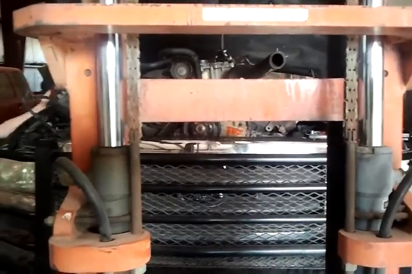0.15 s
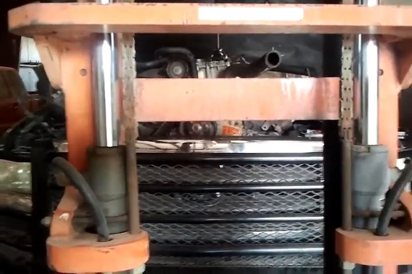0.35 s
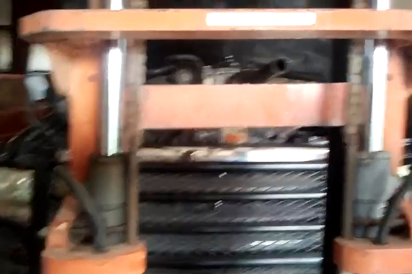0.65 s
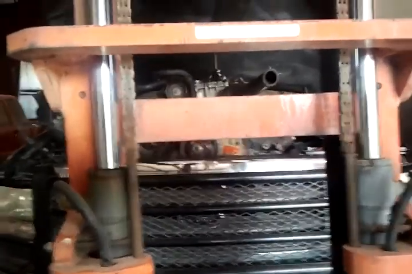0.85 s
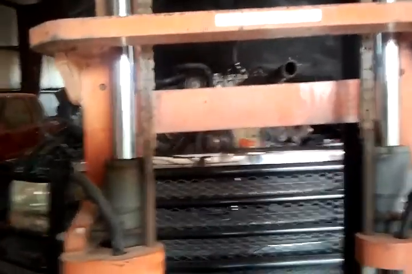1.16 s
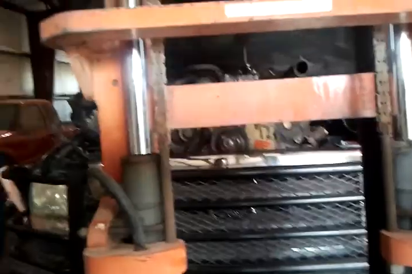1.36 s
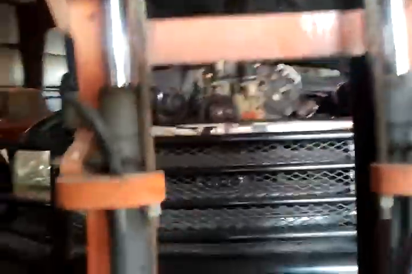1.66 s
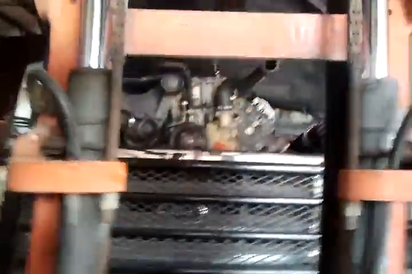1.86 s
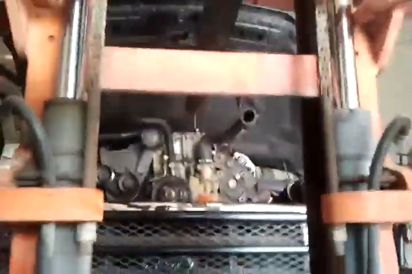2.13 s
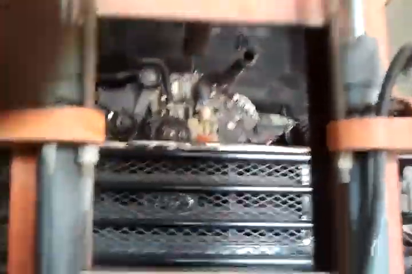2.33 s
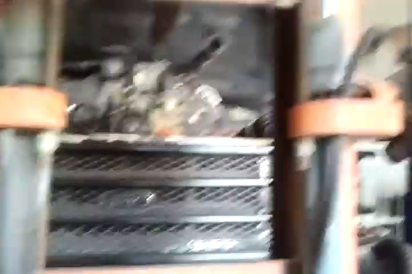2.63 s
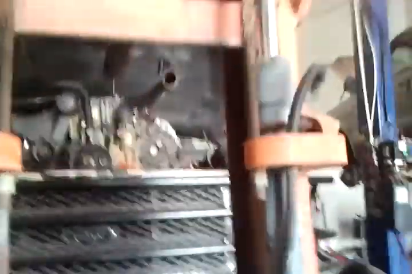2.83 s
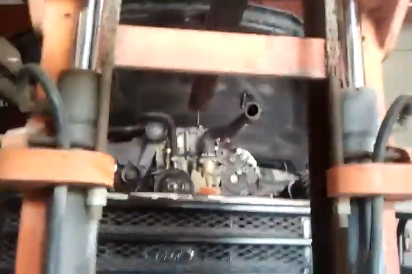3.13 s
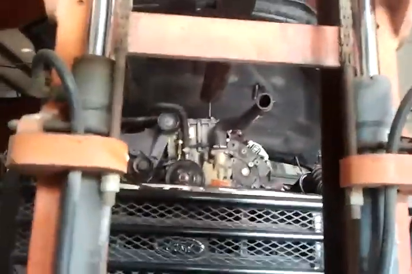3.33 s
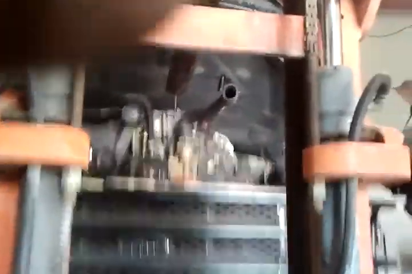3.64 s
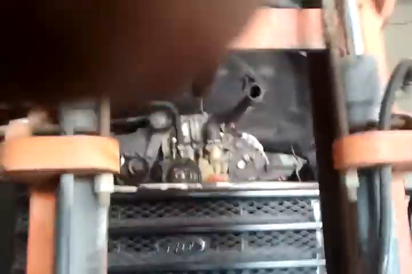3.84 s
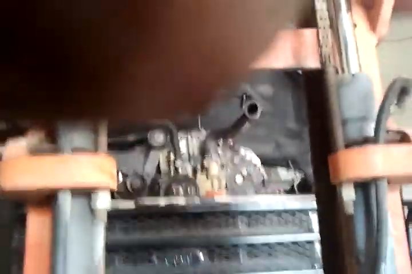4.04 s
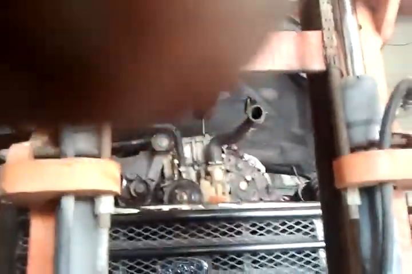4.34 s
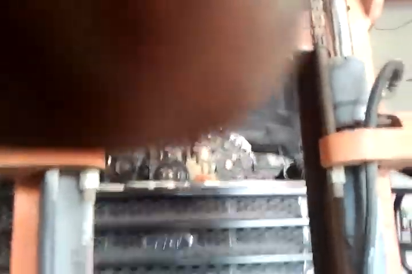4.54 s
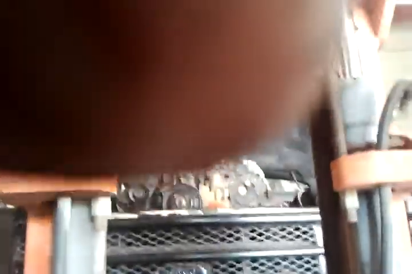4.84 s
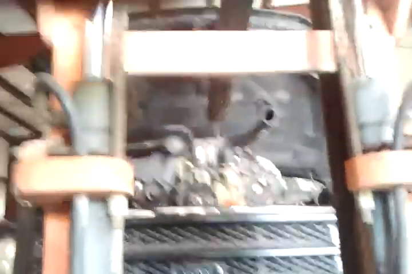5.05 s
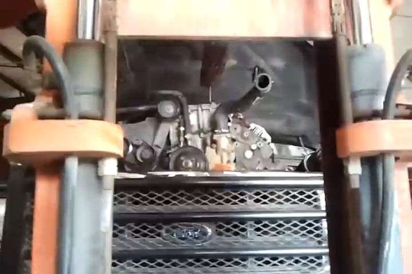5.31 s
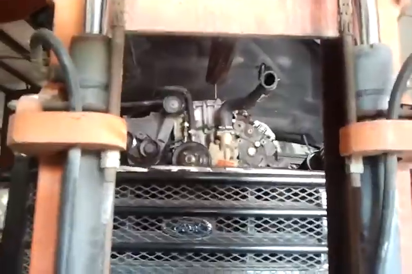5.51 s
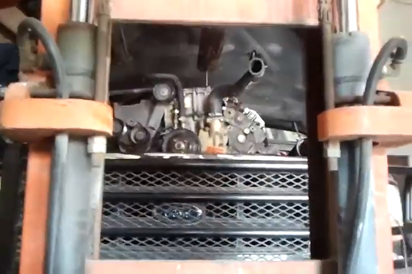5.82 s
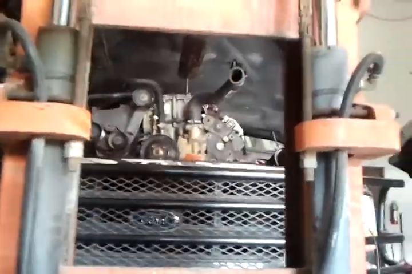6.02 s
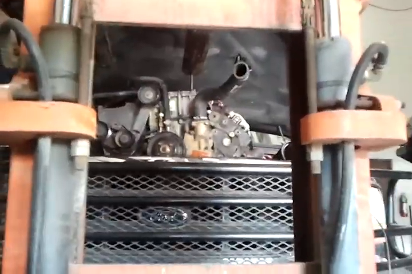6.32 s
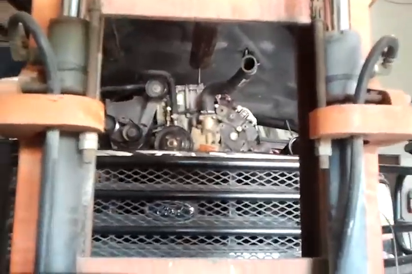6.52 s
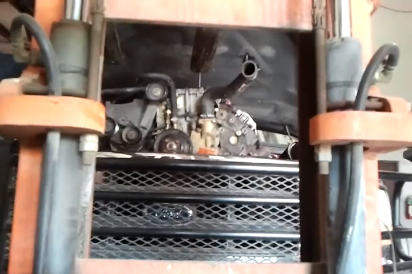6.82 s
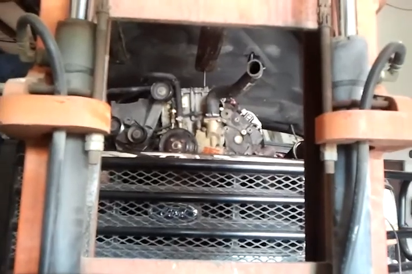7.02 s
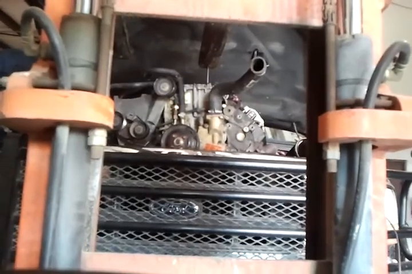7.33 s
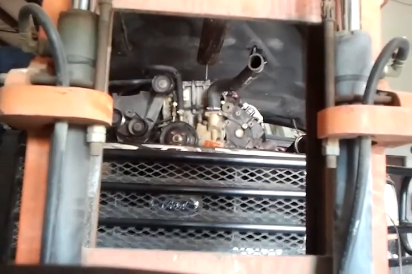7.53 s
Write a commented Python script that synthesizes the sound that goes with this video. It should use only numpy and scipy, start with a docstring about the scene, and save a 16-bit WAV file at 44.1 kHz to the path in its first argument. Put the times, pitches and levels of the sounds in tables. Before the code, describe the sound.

Steady raised-speed forklift engine drone with rushing fan air and hissing clatter, broken by a half-second of silence late on.

```python
"""A four-cylinder forklift engine runs at a steady, raised speed in a workshop, miked just before the mast. Its
exhaust drone beats against the fan's blade tone about eleven times a second; a belt-driven alternator whines,
air rushes through the grille and the valve gear hisses. The handheld microphone edges about 30 cm in towards
the engine bay; near the end the sound breaks off for half a second."""
import sys
import numpy as np
from scipy import signal
from scipy.fft import rfft, irfft
from scipy.io import wavfile
from scipy.ndimage import uniform_filter1d

SR = 44100
rng = np.random.default_rng(int(sys.argv[2]) if len(sys.argv) > 2 else 0)


def waveform_to_disk(signal):
    """Save audio, clipped to [-1, 1], as 16-bit WAV at the path in sys.argv[1]."""
    frames = np.transpose(np.atleast_2d(signal))
    scaled = np.clip(frames, -1, 1) * 32767
    samples = np.round(scaled).astype(np.int16)
    wavfile.write(sys.argv[1], SR, samples)


N = 338247
T = np.arange(N) / SR

# engine speed, hunting slightly: time_s, speed_rpm
ENGINE_SPEED = [(0, 2124), (.8, 2129), (1.25, 2107), (1.6, 2118), (2.35, 2089), (3.25, 2113), (3.55, 2105),
                (4.3, 2100), (4.85, 2127), (5.25, 2116), (6.75, 2136), (7.05, 2121), (7.67, 2125)]
# the cylinders' firing tone: time_s, level_db
FIRING_LEVEL = [(0, -36.5), (.75, -37), (1.25, -38.5), (2.35, -39), (3.2, -36.5), (4.15, -39), (4.8, -36),
                (7.67, -35.5)]
# weaker engine lines: multiple of the four-stroke cycle rate; level_db of each
ENGINE_ORDERS = [5, 6, 7, 8, 10, 15, 16, 18, 33, 38, 40, 52, 57]
ENGINE_ORDER_DB = [-51, -57, -55, -46, -49, -40.5, -40.5, -48, -46, -48, -48, -48, -48]
# drone and fan tone swell together, once before and once after the dropout: time_s
THROB_PEAKS = (.067, 6.882)
# the fan's blade tone, which sets the depth of the throb: time_s, level_db
BLADE_LEVEL = [(0, -25.5), (.9, -29), (1.35, -24), (2.9, -21), (3.35, -27.5), (3.65, -22), (4.35, -23),
               (4.65, -29), (7.67, -26)]
# fan overtones: multiple of the blade tone; level_db of each, relative to that tone
FAN_ORDERS = [2, 3, 4, 5]
FAN_ORDER_DB = [-24, -22, -21.5, -29.5]
# air through the radiator: frequency_hz, level_db
AIR_SPECTRUM = [(25, -36), (55, -16.5), (90, -6.5), (145, -8), (185, 5), (270, 5.5), (325, 1.5), (420, 2),
                (580, 0), (720, -0.5), (900, -1), (1400, -4), (1800, -9.5), (3200, -41)]
# the alternator's whine and its octave: time_s, level_db
WHINE_LEVEL = [(0, -32.5), (2.2, -28.5), (3.3, -25), (3.9, -31), (4.55, -26), (5.9, -26.5), (6.75, -28),
               (7.25, -23.5), (7.67, -25.5)]
OCTAVE_LEVEL = [(0, -32.5), (1.75, -31.5), (2.0, -24), (2.65, -25), (3.15, -31.5), (4.25, -28),
                (4.6, -37.5), (5.5, -30.5), (7.67, -28)]
# weaker alternator lines: multiple of its shaft rate; level_db of each
SHAFT_ORDERS = [12, 15, 17, 18, 20, 24, 25]
SHAFT_ORDER_DB = [-45.5, -42, -46, -49, -49, -48, -51]
# clatter and hiss of the valve gear: frequency_hz, level_db
CLATTER_SPECTRUM = [(900, -20), (1600, -7.5), (1930, 0), (2150, -0.5), (2420, -1), (2720, 1.5), (3050, -6),
                    (3500, -4), (4300, -12.5), (7000, -51)]
HISS_SPECTRUM = [(1500, -23), (3000, -1.5), (4000, 0.5), (4900, 0.5), (5600, -0.5), (6400, 1.5),
                 (7100, -0.5), (7550, -1.5), (8000, -8), (8500, -16), (9000, -40.5)]
# clatter, loudest as the engine top comes clear of the cross-beam: time_s, level_db
CLATTER_LEVEL = [(0, -31), (1.95, -30.5), (2.25, -25.5), (3.3, -27.5), (5.9, -29.5), (6.6, -30)]
# hiss at the microphone: time_s, level_db
HISS_LEVEL = [(0, -29.5), (1.7, -30), (2.2, -29), (3.75, -28), (4.1, -24.5), (4.8, -25.5), (5.1, -22.5),
              (5.35, -22.5), (5.9, -21.5), (6.6, -31)]
# top of the hiss, changing with the microphone's angle: time_s, lift_db
TREBLE_LIFT = [(0, -1.5), (1.7, -0.9), (2.3, 2.5), (3.45, 1.7), (4.1, -2), (4.7, -2.5), (5.1, 3),
               (5.45, -1.6), (7.67, 2.5)]
# ringing panels and covers: pitch_hz, width_hz, level_db
COVER_MODES = [(930, 45, -2.5), (1800, 61, -3.5), (2446, 170, 5), (2600, 80, 6), (2850, 70, 2),
               (3270, 84, -5.5), (3456, 69, -2), (4850, 70, -3), (6460, 82, -5)]
# echoes off mast, floor and walls: extra_path_m, gain
ECHOES = [(.9, .11), (1.7, -.13), (2.9, .15), (4.3, .15), (6.8, -.14), (9.7, .13)]
# how far the microphone has moved in towards the engine bay: time_s, distance_m
MIC_APPROACH = [(0, 0.019), (1.2, 0.016), (2.2, .125), (3.7, .155), (5, .22), (6.8, .3), (7.67, 0.33)]

# the dropout: the sound cuts, falls silent, comes back
CUT_S, SILENT_S, RETURN_S = 5.913, 5.985, 6.563
SOUND_SPEED_M_PER_S = 343


def engine(crank, drone_db=-24.5):
    """Two firings a turn; the exhaust rings at their third harmonic, unequal cylinders add weak lines."""
    firing = level(FIRING_LEVEL) * tone(2 * crank, rough=.03)
    drone = undb(drone_db) * tone(6 * crank, rough=.04)  # equally loud wherever the microphone is
    lines = partials(crank / 2, ENGINE_ORDERS, ENGINE_ORDER_DB, rough=.39, flutter_per_s=4.2)
    return firing + drone + lines


def crank_turns():
    """Crankshaft angle in turns, counted from a swell of the throb on each side of the dropout."""
    turns = np.cumsum(curve(ENGINE_SPEED)) / 60 / SR
    before, after = np.interp(THROB_PEAKS, T, turns)
    return turns - np.where(T < RETURN_S, before, after)


def fan(crank, blades_per_turn=5.6946):
    """Passing blades make a tone with overtones, over air churned through the radiator."""
    blades = blades_per_turn * crank
    overtones = partials(blades, FAN_ORDERS, FAN_ORDER_DB, rough=.46, flutter_per_s=10)
    air = noise(AIR_SPECTRUM) * undb(.45 * wander(25))
    hum = level(BLADE_LEVEL) * (tone(blades, rough=.05) + overtones)
    return hum + approach_gain(base_db=-24, db_per_m=2.5) * air


def alternator(crank, cycles_per_turn=11.249, wander_db=.76):
    """A fluttering whine, five cycles to a shaft turn, with a strong octave and fainter shaft lines."""
    cycles = cycles_per_turn * crank
    swell = undb(wander_db * wander(3.9))
    whine = level(WHINE_LEVEL) * swell * tone(cycles, rough=.28)
    octave = level(OCTAVE_LEVEL) * tone(2 * cycles, rough=.17)
    lines = partials(cycles / 5, SHAFT_ORDERS, SHAFT_ORDER_DB, rough=.25, flutter_per_s=9)
    return whine + octave + lines


def valve_gear(crank):
    """Dense ticking merges into clatter and hiss, pulsing lightly with firings, camshaft and tappets."""
    firing, cam, tappets = (np.cos(2 * np.pi * per_turn * crank) for per_turn in (2, 1.5, 4.5))
    clatter = noise(CLATTER_SPECTRUM) + undb(-7) * covers()
    clatter *= (1 + .08 * tappets + .03 * firing) * undb(.5 * wander(60))
    hiss = mic_angle(noise(HISS_SPECTRUM))
    hiss *= (1 + .055 * firing + .045 * cam) * undb(.19 * wander(60))
    return reflections(level(CLATTER_LEVEL) * clatter + level(HISS_LEVEL) * hiss)


def covers():
    """Engine covers and panels, shaken all the time, ring in narrow bands."""
    bins_hz = np.arange(N // 2 + 1) * SR / N
    response = sum(undb(db) / (1 + 2j * (bins_hz - hz) / width) for hz, width, db in COVER_MODES)
    ringing = irfft(rfft(rng.standard_normal(N)) * response, N)
    return ringing / ringing.std()


def engine_bay():
    """Churned air sounds the hollow of the open engine bay, louder as the microphone nears it."""
    return ring(centre_hz=596, width_hz=70) * approach_gain(base_db=-42.5, db_per_m=35)


def whistle():
    """A thin, airy ring high in the hiss, plainest when the hiss is bright."""
    return ring(centre_hz=7500, width_hz=100) * undb(-51.5 + 4 * curve(TREBLE_LIFT))


def reflections(x):
    """Near surfaces comb the noise; the notches slide as the microphone moves."""
    moved_m = curve(MIC_APPROACH)
    combed = x.copy()
    for k, (path_m, gain) in enumerate(ECHOES):
        delay_s = (path_m + (-1) ** k * moved_m) / SOUND_SPEED_M_PER_S
        combed += gain * np.interp(T - delay_s, T, x)
    return combed * x.std() / combed.std()


def mic_angle(hiss, above_hz=5800):
    """Turning the microphone lifts or lowers the top of the hiss."""
    top = signal.sosfiltfilt(signal.butter(4, above_hz, "high", fs=SR, output="sos"), hiss)
    return hiss + (level(TREBLE_LIFT) - 1) * top


def approach_gain(base_db, db_per_m):
    """Gain of a source that grows as the microphone moves in."""
    return undb(base_db + db_per_m * curve(MIC_APPROACH))


def dropout(tail_db=-22, fall_db_per_s=180, return_db=-16, recovery_s=.086):
    """Gain over time: a sudden cut, a faint tail, silence, then a quiet return that recovers."""
    tail = undb(tail_db - fall_db_per_s * np.maximum(T - CUT_S, 0))
    recovery = undb(return_db * np.exp(-np.maximum(T - RETURN_S, 0) / recovery_s))
    gain = np.select([T < CUT_S, T < SILENT_S, T < RETURN_S], [1, tail, 0], recovery)
    return uniform_filter1d(gain, size=90)


def tone(cycles, rough, flutter_per_s=30):
    """A line of rms near 1 on a turning phase; turbulence shakes its strength and timing."""
    angle = 2 * np.pi * cycles
    strength = 1 + rough * wander(flutter_per_s)
    jitter = rough * wander(flutter_per_s)
    return np.sqrt(2) * (strength * np.cos(angle) + jitter * np.sin(angle))


def partials(cycles, orders, levels_db, rough, flutter_per_s):
    """Fluttering tones at multiples of one rate."""
    return sum(undb(db) * tone(k * cycles, rough, flutter_per_s) for k, db in zip(orders, levels_db))


def ring(centre_hz, width_hz):
    """Narrow-band noise of rms 1."""
    hz = centre_hz + width_hz * np.array([-3, -1, 0, 1, 3])
    return noise(list(zip(hz, [-60, -12, 0, -12, -60])))


def noise(spectrum):
    """Noise of rms 1, coloured by rows of frequency_hz, level_db."""
    hz, db = np.transpose(spectrum)
    bins_hz = np.maximum(np.arange(N // 2 + 1) * SR / N, 1)
    response = undb(np.interp(np.log(bins_hz), np.log(hz), db))
    x = irfft(rfft(rng.standard_normal(N)) * response, N)
    return x / x.std()


def wander(per_s):
    """Random values, per_s of them a second, joined by straight lines; spread near 1."""
    steps = rng.standard_normal(size=4096)
    return 1.2 * np.interp(T * per_s, np.arange(len(steps)), steps)


def curve(rows):
    """Rows of time_s, value, joined by straight lines."""
    return np.interp(T, *np.transpose(rows))


def level(rows):
    """Gain over time from rows of time_s, level_db."""
    return undb(curve(rows))


def undb(db):
    """Decibels to gain."""
    return 10 ** (np.asarray(db) / 20)


def scene():
    """The forklift from just before the mast, in mono; one crankshaft drives all turning parts."""
    crank = crank_turns()
    machinery = engine(crank) + fan(crank) + alternator(crank)
    return (machinery + engine_bay() + valve_gear(crank) + whistle())[None]


def record(dry, low_cut_hz=39, high_cut_hz=8750):
    """The handheld microphone loses the deepest bass and the top; the sound breaks off once."""
    low_cut = signal.butter(4, low_cut_hz, "high", fs=SR, output="sos")
    high_cut = signal.ellip(10, .2, 80, high_cut_hz, fs=SR, output="sos")
    return signal.sosfilt(high_cut, signal.sosfilt(low_cut, dry) * dropout())


dry = scene()
out = record(dry)
waveform_to_disk(out)
```